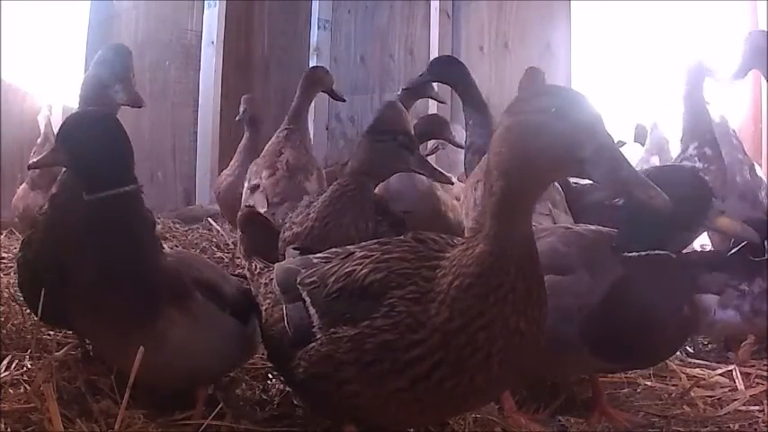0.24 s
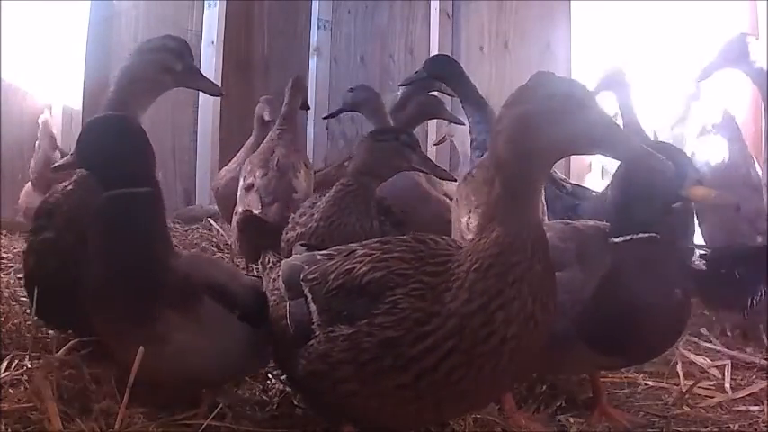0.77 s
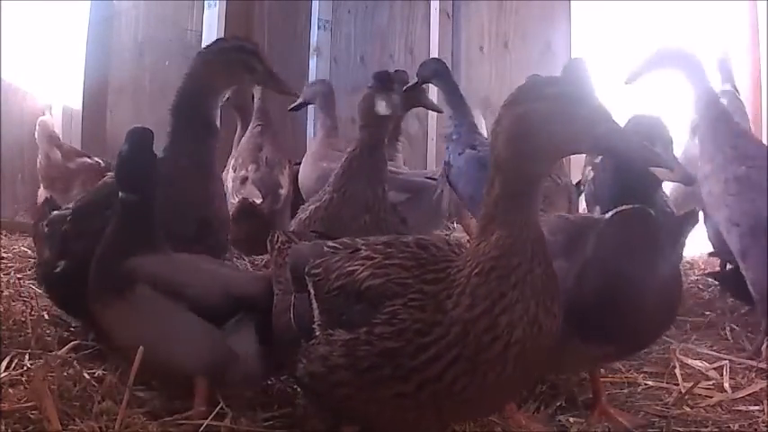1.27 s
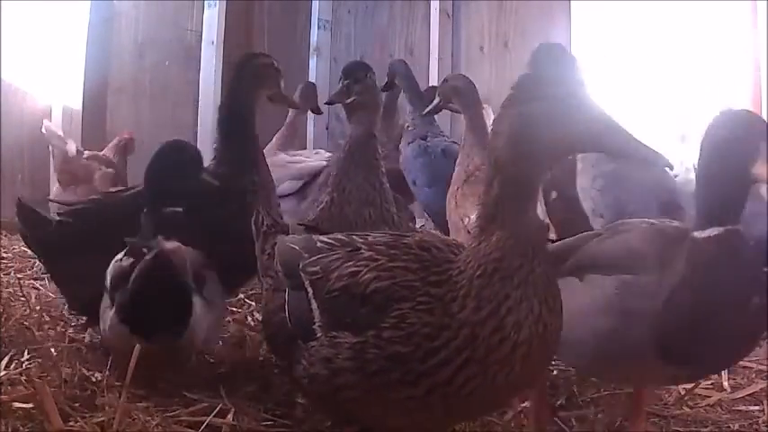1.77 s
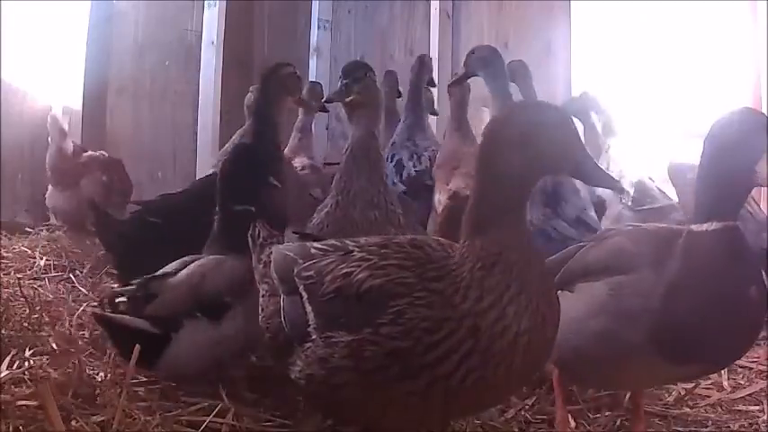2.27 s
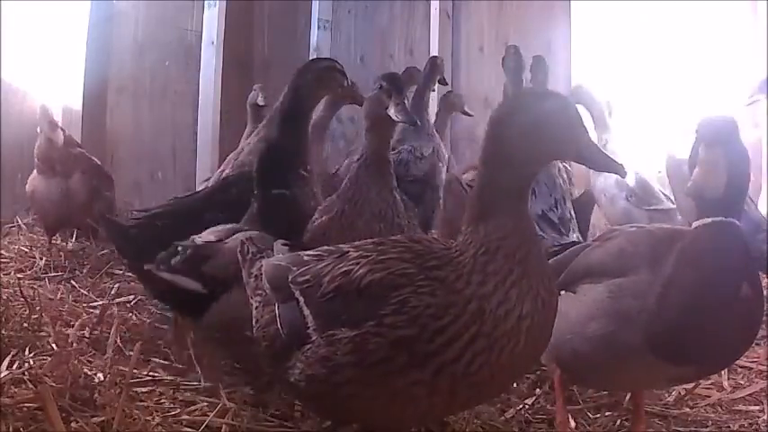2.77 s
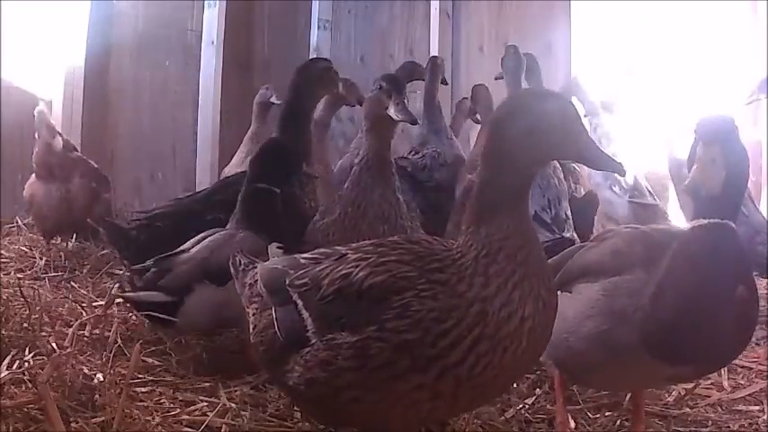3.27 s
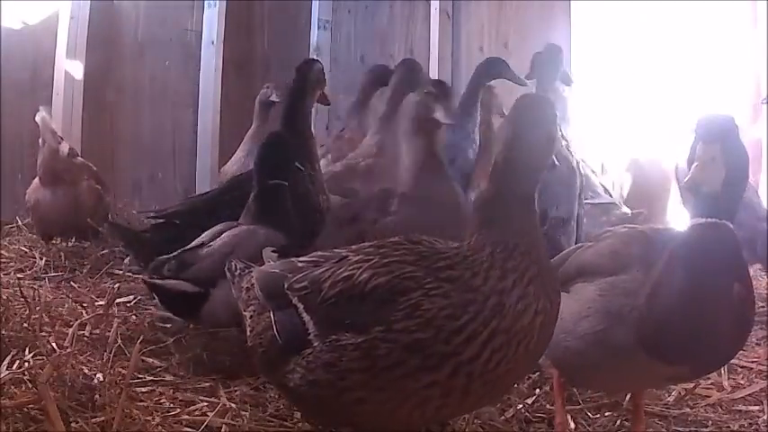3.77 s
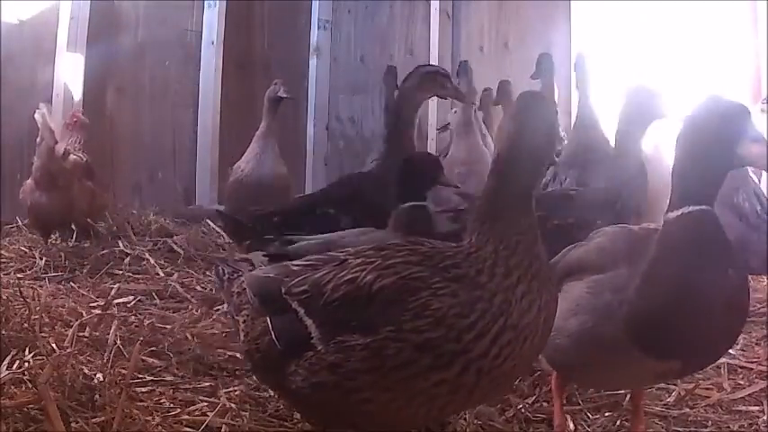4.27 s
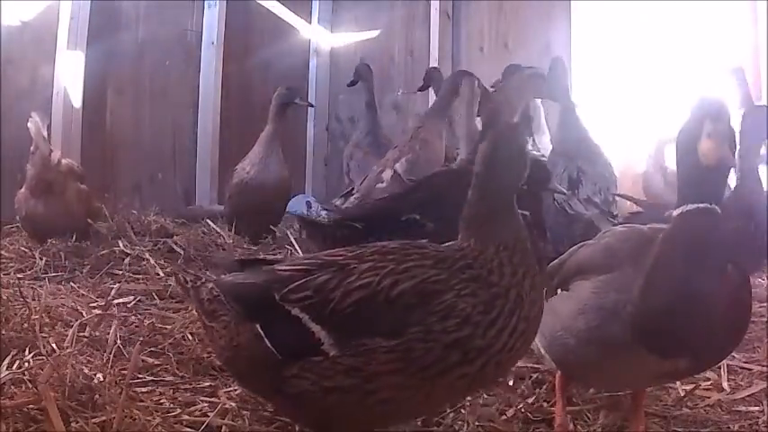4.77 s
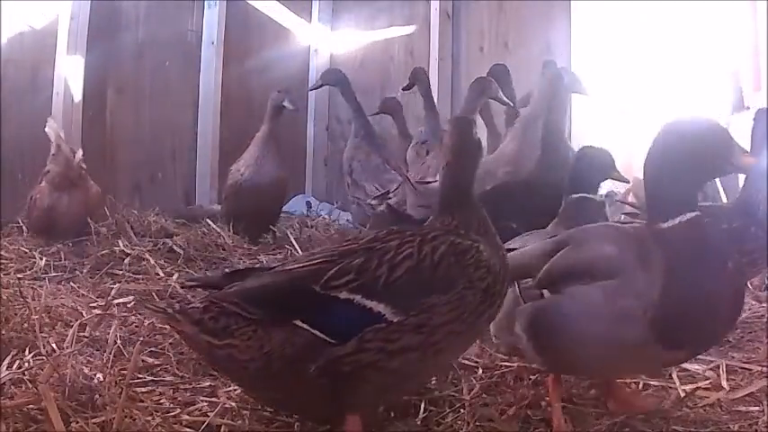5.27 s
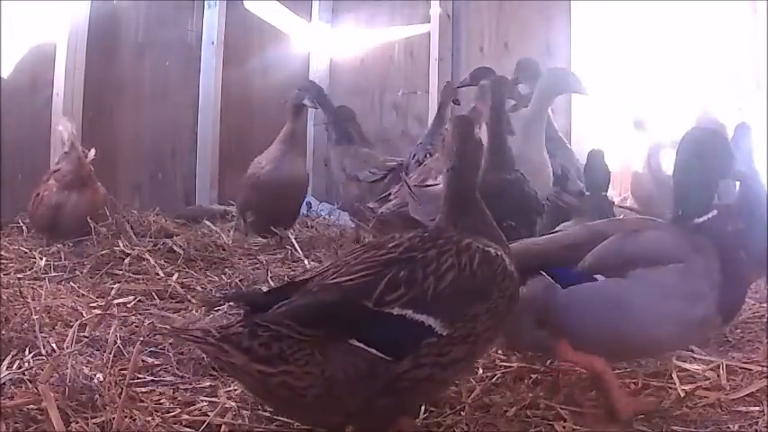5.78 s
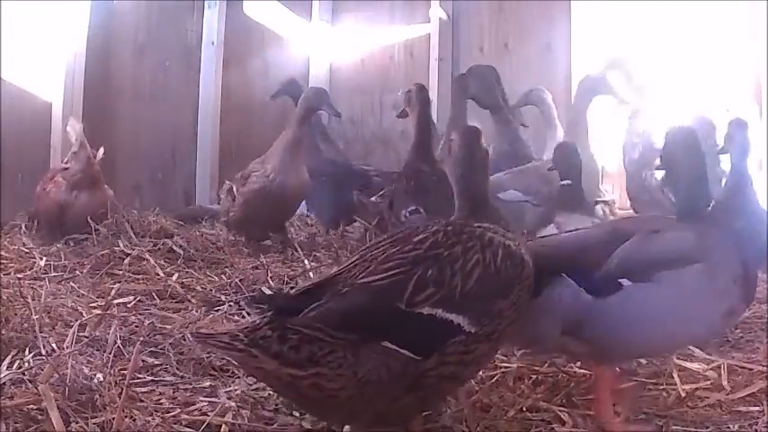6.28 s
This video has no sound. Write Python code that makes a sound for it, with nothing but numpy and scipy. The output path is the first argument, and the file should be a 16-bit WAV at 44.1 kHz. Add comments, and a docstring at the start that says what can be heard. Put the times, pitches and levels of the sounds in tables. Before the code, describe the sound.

Inside a small wooden barn, a flock of ducks quacks near the microphone. First come three quiet rasps from a drake, then some soft quacks, and soon the ducks are calling loudly over one another, several nasal quacks a second with only tiny gaps. The calls bounce briefly off the walls above a faint background hiss. The sound has muted treble, and the strongest calls distort a little.

```python
"""Ducks in a small wooden barn.

A drake gives three soft rasps, then hens quack over one another in a dense, close chorus.
Each call is a train of membrane slaps and air puffs, shaped by throat, chest, bill and nasal passage.
Plank walls throw the calls back; the loudest quacks overload the dull, narrow-band recording."""
import sys
import numpy as np
from scipy import signal
from scipy.io import wavfile
from scipy.ndimage import uniform_filter1d, minimum_filter1d

SR = 44100
rng = np.random.default_rng(int(sys.argv[2]) if len(sys.argv) > 2 else 0)


def to_wav(sig):
    """Store sig (one row per channel, or 1-D mono) as 16-bit WAV at the path in sys.argv[1].

    Samples outside -1..1 are clipped; the rate is SR.
    """
    pcm = np.clip(np.atleast_2d(sig), -1, 1) * 32767
    pcm = np.round(pcm).astype(np.int16)
    wavfile.write(sys.argv[1], SR, pcm.T)  # frames by channels


N = 288414

# calls: start_s, length_s, effort_db, pitch_hz, throat_hz, bright_db
HEN_QUACKS = [(0.704, 0.069, -37.5, 188.6, 1220, 2), (0.752, 0.098, -20, 167, 1560, 2),
              (0.822, 0.081, -22, 248.0, 1260, -11.5), (1.003, 0.15, -13.5, 255.5, 1300.0, 0.5),
              (1.118, 0.14, -4.5, 194, 1113, -3.5), (1.212, 0.17, -16, 198.0, 1380.0, 0),
              (1.335, 0.092, -7.5, 251.4, 1650, 3.5), (1.508, 0.12, -1, 173.5, 1420.0, -0.7),
              (1.606, 0.11, -5, 220.6, 1520, -0.2), (1.697, 0.072, -11, 251.5, 1500, 2.5),
              (1.833, 0.23, -1, 215.5, 1400, -8.5), (1.982, 0.081, -4.5, 187.9, 1630, -0.5),
              (2.069, 0.14, -5, 267.5, 1570, 1), (2.226, 0.13, -0.5, 234.2, 1340, -1),
              (2.336, 0.13, 1.9, 272.7, 1510, -4.3), (2.478, 0.23, -10.5, 223.6, 1440, 3.5),
              (2.617, 0.18, 0.0, 220.7, 1544, 0), (2.788, 0.088, -3.5, 157.8, 1710, 1.1),
              (2.856, 0.2, -4.5, 215.6, 1590, 0), (2.971, 0.1, -1.5, 290.6, 1466, -3.5),
              (3.043, 0.17, -3, 284.9, 1720, -6.5), (3.249, 0.1, -2.5, 230.5, 1520, -2.2),
              (3.486, 0.12, -6.5, 162.1, 1547, 0.5), (3.535, 0.18, -8.5, 230.1, 1680, 1),
              (3.737, 0.11, -2.5, 231.1, 1550, -1), (3.869, 0.19, 0, 256.8, 1490.0, 1),
              (3.993, 0.1, 2, 244.6, 1584, -1.4), (4.097, 0.13, -1.5, 270.3, 1710, -1),
              (4.209, 0.19, 3.5, 150.5, 1613, -2.5), (4.359, 0.11, -8, 262.3, 1540, 1.5),
              (4.426, 0.133, -2, 284.2, 1515, -1.8), (4.543, 0.16, 3.5, 178.1, 1570, -0.5),
              (4.727, 0.29, -5.5, 254.5, 1650, -11), (4.86, 0.18, 2.5, 245.1, 1440, 0.4),
              (5.024, 0.15, -11, 211.0, 1465, 1.2), (5.137, 0.11, -0.8, 252.2, 1470, -1.5),
              (5.416, 0.11, -1, 234.0, 1554, -1.5), (5.488, 0.19, -2.5, 232.2, 1320, -1.5),
              (5.59, 0.15, -1.2, 228, 1394, -4.5), (5.774, 0.084, 3, 218.4, 1435, -3),
              (5.81, 0.14, 0.9, 225.0, 1490, -4.5), (6.009, 0.19, -11.5, 241.4, 1930, -7),
              (6.088, 0.074, -5, 234.9, 1450, 3.5), (6.142, 0.2, -3, 245, 1446, -0.9),
              (6.492, 0.13, -2.5, 197.1, 1400, 1.5)]
DRAKE_RASPS = [(.05, 0.088, -22, 269, 2200, 0), (.254, 0.091, -18.5, 166, 2280, -3.5),
               (.451, 0.069, -19, 269.4, 2180, -1.5)]
# chest, bill and nasal resonances: centre_hz, width_hz, gain_db
SOFT_TRACT = [(765, 563, -4), (2450, 590, -2), (3500, 480, -24)]
FORCED_TRACT = [(745.4, 626, -10.5), (2494, 567, -9), (4006, 960, -20)]
DRAKE_TRACT = [(1330, 370, -24), (2560, 731, -4.5), (4550, 490, -14)]
# call-to-call spread of those centres: chest_ratio, bill_ratio, nasal_ratio
TRACT_SCATTER = (0.045, 0.027, 0.084)
# barn decay: freq_hz, t60_s
BARN_DECAY = [(250, 0.49), (1400, 0.34), (2800, 0.35), (5500, 0.17)]
# standing waves: centre_hz, width_hz, gain_db
BARN_MODES = [(241.8, 62, 5.5), (891, 140, -7.5), (1397.5, 43, -4), (2696, 99, -7), (3280, 84, -13.5)]
# barn and microphone colour on the calls: freq_hz, gain_db
CALL_COLOUR = [(70, -3), (180, -0.5), (300, -2), (620, -18), (830, -16.5), (1080, -10), (1270, 3.5),
               (1750, -4), (2200, -4.5), (2500, -13.5), (2800, -4), (3200, -1), (3800, -7.5), (4900, -22),
               (5650, -24), (6300, -46.5)]
# background spectrum: freq_hz, density_db
HUSH_SPECTRUM = [(25, -11.5), (60, -13.5), (120, -19.5), (300, -18.5), (550, -20.5), (1050, -16.5),
                 (1400, -6), (2040, -2.5), (2860, -10.5), (4200, -23), (5100, -30), (6200, -35),
                 (11000, -31.5), (15000, -40)]
# treble response after the overload: freq_hz, gain_db
RECORDING_TREBLE = [(5400, 1), (6200, -15.5), (7000, -8.5), (7900, -22.5), (9000, -8.5), (11000, -4),
                    (13500, -4), (15500, -5)]


def hens(spot_count=11, level_db=-0.53, soft_db=-18.5, soft_glide=0.14, forced_glide=-0.22):
    """Quacks rotate through spots in the barn: chesty and rising if soft, shrill and sinking if forced."""
    spots = np.zeros((spot_count, N))
    for k, row in enumerate(HEN_QUACKS):
        effort_db = row[2]
        soft = np.clip(effort_db / soft_db, 0, 1)
        tract = soft * np.array(SOFT_TRACT) + (1 - soft) * np.array(FORCED_TRACT)
        glide = soft * soft_glide + (1 - soft) * forced_glide
        start_s, quack = call(row, tract, glide, breath=0.49, jitter_cycles=0.028, shimmer_db=4)
        add(spots[k % spot_count], start_s, quack)
    chorus = sum(spot.std() * unit_rms(barn(spot, early_db=-3.5, tail_db=-7.5)) for spot in spots)
    return gain_of(level_db) * chorus


def drake(level_db=4):
    """Breathy, uneven rasps close by."""
    voice = np.zeros(N)
    for row in DRAKE_RASPS:
        add(voice, *call(row, DRAKE_TRACT, glide=-0.12, breath=0.63, jitter_cycles=0.2, shimmer_db=6))
    return gain_of(level_db) * voice.std() * unit_rms(barn(voice, early_db=-2, tail_db=-14.5))


def call(row, tract, glide, breath, jitter_cycles, shimmer_db, lead_s=0.035, lead_db=-21):
    """The syrinx drives a gliding throat resonance and three steady ones. Returns start_s, sound."""
    start_s, length_s, effort_db, pitch_hz, throat_hz, bright_db = row
    t = np.arange(-lead_s, length_s, 1 / SR)
    progress = np.clip(t / length_s, 0, 1)
    flow = syrinx(progress, pitch_hz, breath, jitter_cycles, shimmer_db)
    throat = resonate(flow, throat_hz * (1 + glide * (progress - 0.5)), width_hz=800)
    detunes = 1 + TRACT_SCATTER * rng.standard_normal(len(tract))
    chest, bill, nasal = (gain_of(db) * resonate(flow, hz * detune, width_hz)
                          for (hz, width_hz, db), detune in zip(tract, detunes))
    voice = throat - chest + gain_of(bright_db) * (nasal - bill)  # neighbours in opposite phase
    swell = abs(np.sin(np.pi * progress ** 0.71)) ** 1.127  # opens fast, closes slower
    creak = gain_of(lead_db) * np.maximum(1 - abs(t) / lead_s, 0) ** 2  # pressure builds
    envelope = uniform_filter1d(np.maximum(swell, creak), 500)
    return start_s - lead_s, gain_of(effort_db) * envelope * voice


def syrinx(progress, pitch_hz, breath, jitter_cycles, shimmer_db, puff_cycles=0.43, max_cycles=128):
    """Membranes slap shut unevenly; an air puff follows each slap. breath is the puffs' power share."""
    offsets = jitter_cycles * rng.standard_normal(max_cycles)
    force_db = shimmer_db * (2 * rng.random(max_cycles) - 1)
    air = rng.standard_normal(16384)[:len(progress)]
    arched_hz = pitch_hz * (1 + 0.07 * (np.sin(np.pi * progress) - np.sqrt(0.5)))
    phase = np.cumsum(arched_hz) / SR
    phase += np.interp(phase, np.arange(max_cycles), offsets)
    cycle = np.maximum.accumulate(np.floor(phase)).astype(int)
    strength = gain_of(force_db[cycle % max_cycles])
    slaps = np.diff(cycle, prepend=cycle[0]) * strength
    slaps = signal.sosfilt(signal.butter(2, 450, "high", fs=SR, output="sos"), slaps)  # weak fundamental
    puffs = np.exp(-(phase % 1) / puff_cycles) * strength * air
    return np.sqrt(1 - breath) * unit_rms(slaps) + np.sqrt(breath) * unit_rms(puffs)


def barn(x, early_db, tail_db, direct_db=-3.5, early_s=0.012, build_s=0.0074, echo_count=8):
    """Path from one spot: direct sound, echoes off bodies and planks, dense tail."""
    t = np.arange(SR // 2) / SR
    early = np.zeros(len(t))
    delays_s = early_s * rng.uniform(0.1975, 1, echo_count) ** 2
    early[(delays_s * SR).astype(int)] = rng.choice([-1, 1], echo_count) / np.sqrt(echo_count)
    hz, frame_s, spectra = signal.stft(rng.standard_normal(len(t)), SR, nperseg=256)
    spectra *= gain_of(-60 * frame_s / value_at(BARN_DECAY, hz)[:, None])
    tail = signal.istft(spectra, SR)[1][:len(t)] * (1 - np.exp(-t / build_s))
    response = gain_of(early_db) * early + gain_of(tail_db) * tail / np.linalg.norm(tail)
    response[0] += gain_of(direct_db)
    return signal.oaconvolve(x, response)[:N]


def standing_waves(calls):
    """Modes between the walls ring with the calls."""
    return sum(gain_of(db) * resonate(calls, hz, width_hz) for hz, width_hz, db in BARN_MODES)


def fizz(calls, gain_db=-61):
    """Faint white noise that follows the call level."""
    return gain_of(gain_db) * uniform_filter1d(abs(calls), 1500) * rng.standard_normal(N)


def hush(level_db=-58):
    """Steady background noise of the barn."""
    return gain_of(level_db) * unit_rms(coloured(rng.standard_normal(N), HUSH_SPECTRUM))


def overload(x, limit=0.45, window_samples=60, knee=0.34, headroom=0.12, thump_db=-18, thump_hz=70):
    """Peaks are limited and rounded; the excess shifts the resting level, a low thump."""
    allowed_gain = limit / np.maximum(abs(x), limit)
    held = x * uniform_filter1d(minimum_filter1d(allowed_gain, window_samples), window_samples)
    over = np.maximum(abs(held) - knee, 0)
    rounded = held - np.sign(held) * (over - headroom * np.tanh(over / headroom))
    thump = signal.lfilter(*signal.butter(1, thump_hz, fs=SR), abs(x - rounded))
    return rounded + gain_of(thump_db) * thump


def resonate(x, hz, width_hz):
    """Two unity-gain resonators in series; hz may move."""
    carrier = np.exp(2j * np.pi * np.cumsum(hz * np.ones(len(x))) / SR)
    pole = np.exp(-np.pi * width_hz / SR)
    for _ in range(2):
        x = 2 * (carrier * signal.lfilter([1 - pole], [1, -pole], x / carrier)).real
    return x


def coloured(x, curve, fft_size=4096):
    """Minimum-phase filter from rows of freq_hz, gain_db."""
    hz = abs(np.fft.fftfreq(fft_size, 1 / SR))
    log_gain = np.log(gain_of(value_at(curve, hz)))
    taps = np.fft.ifft(np.exp(np.conj(signal.hilbert(log_gain)))).real
    return signal.oaconvolve(x, taps[:fft_size // 2])[:N]


def value_at(curve, hz):
    """Interpolates on a log-frequency axis."""
    freq_hz, values = np.transpose(curve)
    return np.interp(np.log(hz + 1), np.log(freq_hz + 1), values)


def gain_of(db):
    """Decibels to amplitude."""
    return 10 ** (np.asarray(db) / 20)


def unit_rms(x):
    """Scales to rms 1."""
    return x / np.sqrt(np.mean(x ** 2) + 1e-20)


def add(mix, start_s, sound):
    """Mixes a sound in at start_s."""
    part = mix[max(round(start_s * SR), 0):][:len(sound)]
    part += sound[:len(part)]


def scene():
    """Ducks, barn and background, mono."""
    ducks = coloured(drake() + hens(), CALL_COLOUR)
    return (ducks + standing_waves(ducks) + fizz(ducks) + hush())[None]


def record(dry, cutoff_hz=15800):
    """Recording: overload, dull treble with a notch near 8 kHz, band limit."""
    dulled = coloured(overload(dry[0]), RECORDING_TREBLE)
    lowpass = signal.firwin(511, cutoff_hz, window=("kaiser", 9), fs=SR)
    return signal.oaconvolve(dulled, lowpass, "same")[None]


dry = scene()
out = record(dry)
to_wav(out)
```